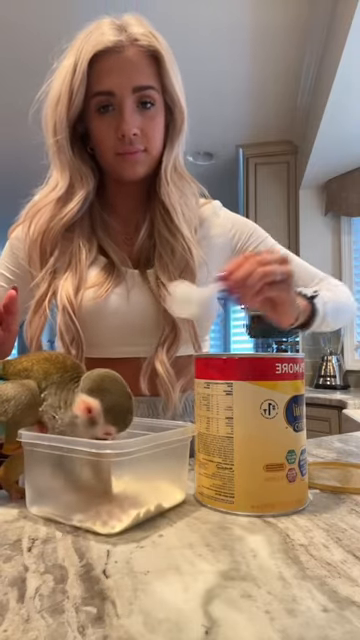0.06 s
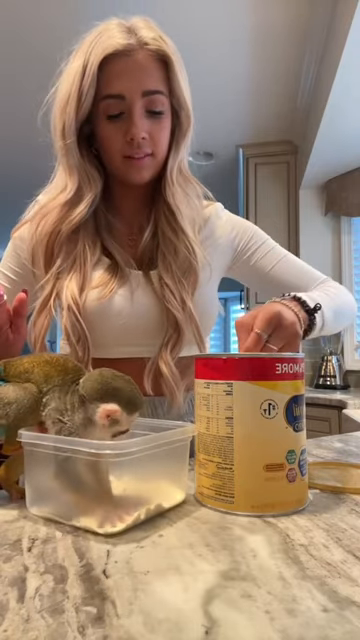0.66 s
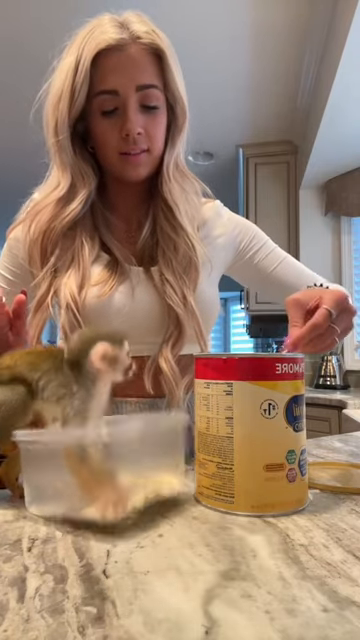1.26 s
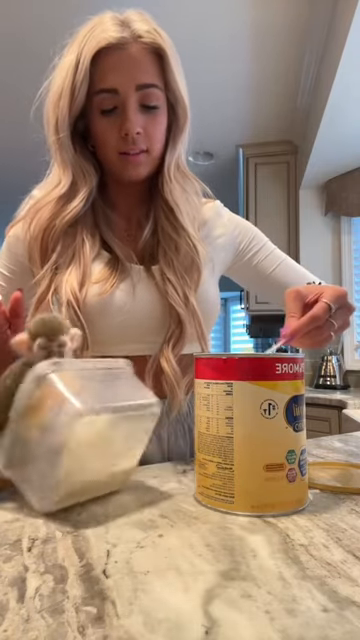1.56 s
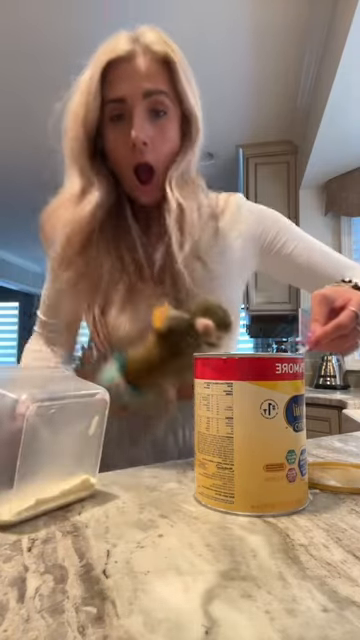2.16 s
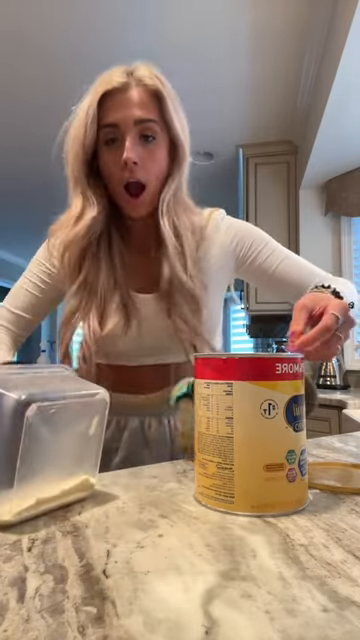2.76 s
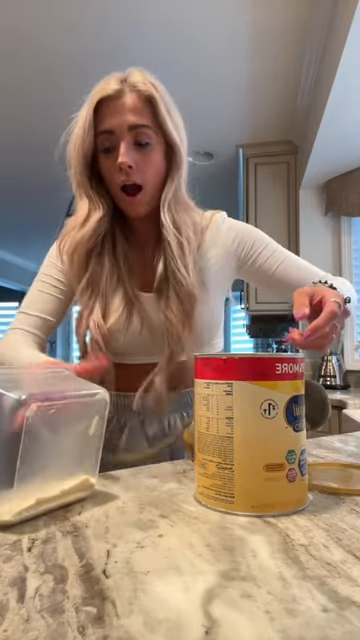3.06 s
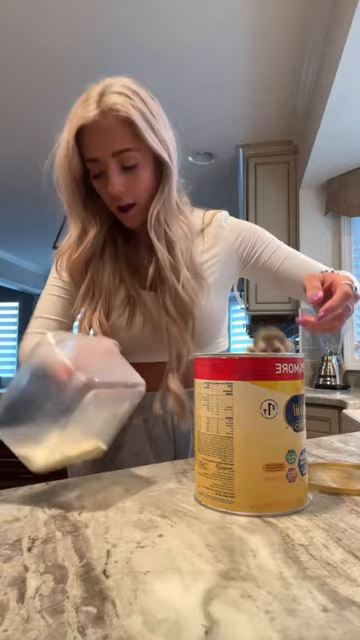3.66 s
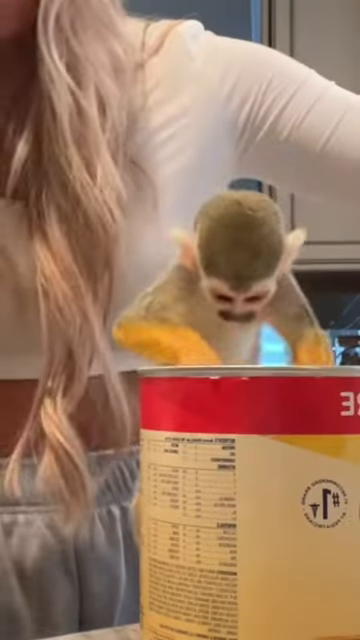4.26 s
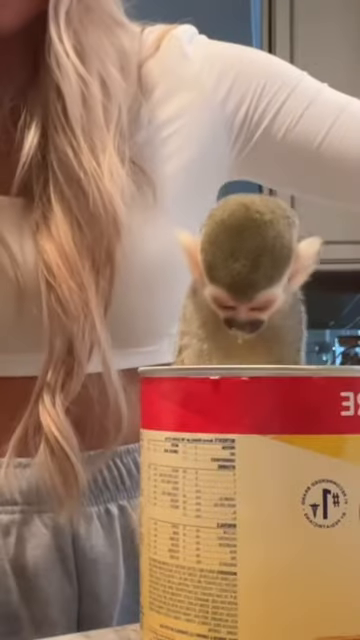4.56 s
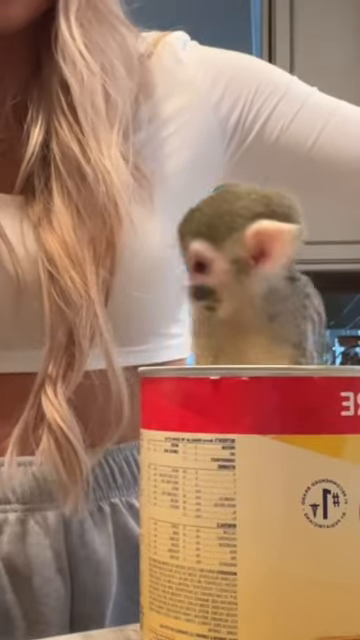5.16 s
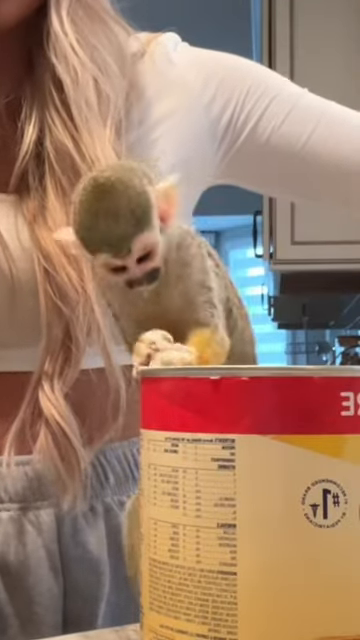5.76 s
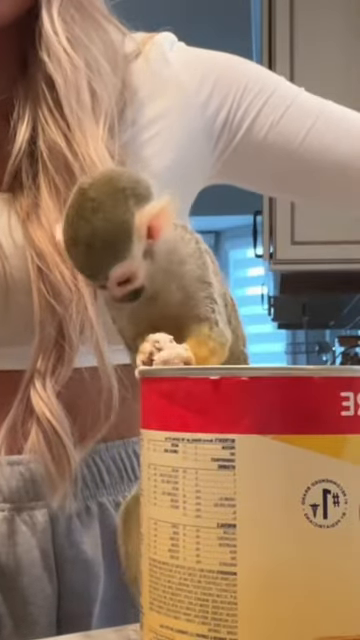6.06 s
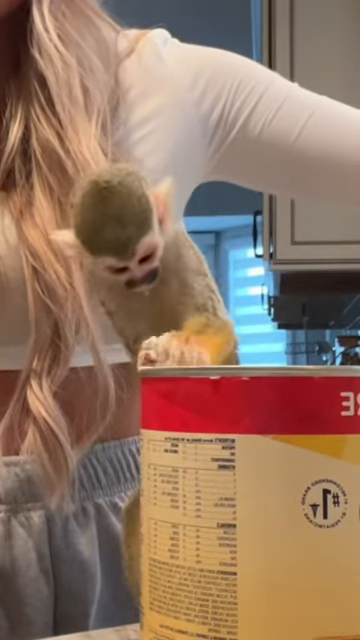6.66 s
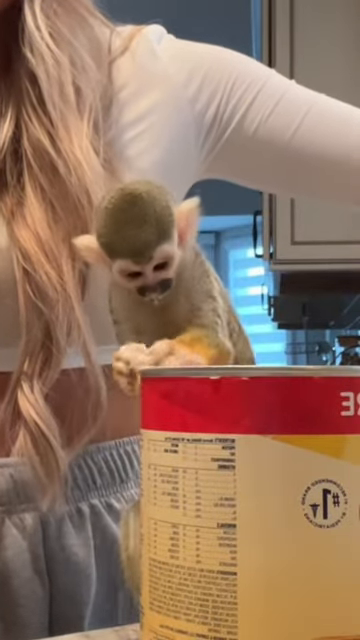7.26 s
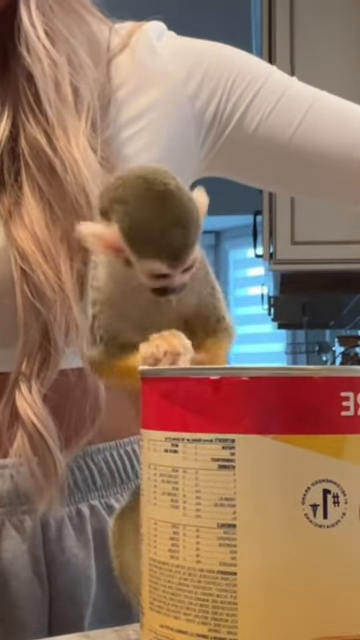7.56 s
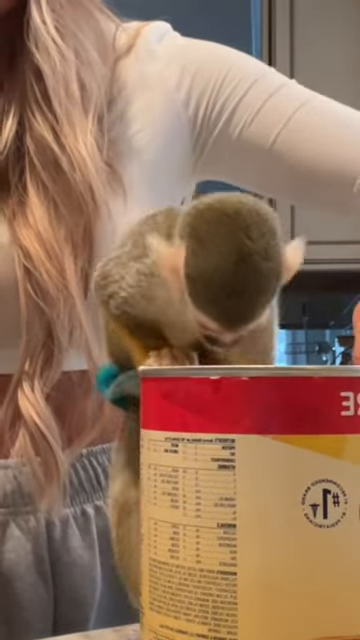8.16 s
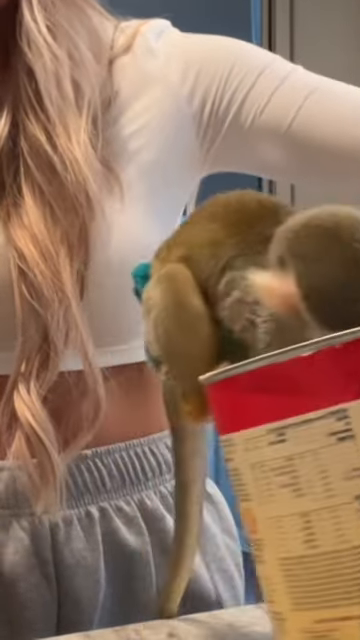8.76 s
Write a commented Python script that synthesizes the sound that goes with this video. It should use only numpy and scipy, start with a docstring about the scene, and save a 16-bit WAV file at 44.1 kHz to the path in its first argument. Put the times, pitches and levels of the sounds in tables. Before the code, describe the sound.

In a kitchen with a steady low appliance hum, a nearby scoop scratches and clicks in powder. The loudest moment comes early: a plastic tub skids, knocks and tumbles onto a stone counter with dull thuds. It then turns quiet, with light clicks, brief swishes of clothing and tiny paws picking at powder. Finally a short, damped clack sounds on a metal can, which slides over the stone with a gritty scrape.

```python
"""A plastic scoop clicks and scrapes in a can of powder, over the hum of an appliance. A small monkey
tips a plastic tub over and jumps down; clothing rustles. The monkey climbs onto the can and rummages
until it slides away. Friction is a train of tiny slips; impacts excite the damped modes of tub and can.
Soft bumps carry through the stone counter, and the kitchen reverberates briefly."""
import sys
import numpy as np
from scipy import signal
from scipy.fft import rfft, irfft
from scipy.io import wavfile
from scipy.ndimage import uniform_filter1d

SR = 44100
rng = np.random.default_rng(int(sys.argv[2]) if len(sys.argv) > 2 else 0)


def generate_wav(sig):
    """Save sig (samples, or channels by samples) to the path in sys.argv[1] as 16-bit PCM at SR."""
    pcm = np.round(np.clip(np.atleast_2d(sig).T, -1, 1) * 32767).astype(np.int16)
    wavfile.write(sys.argv[1], SR, pcm)


N = 388080
TIME = np.arange(N) / SR
BIN_HZ = np.fft.rfftfreq(N, 1 / SR)


def amp(db):
    """Decibels as an amplitude ratio."""
    return 10 ** (np.asarray(db) / 20)


def unit_rms(x):
    """Normalisation to rms 1."""
    return x / np.sqrt(np.mean(x ** 2) + 1e-20)


def curve_at(points, hz):
    """Interpolation of (frequency, value) points on a logarithmic frequency axis."""
    point_hz, value = np.transpose(points)
    return np.interp(np.log(hz + 1), np.log(point_hz + 1), value)


def add(mix, start_s, sound):
    """Superposition: a sound joins the mix at its start time."""
    part = mix[max(0, round(start_s * SR)):][:len(sound)]
    part += sound[:len(part)]


def colour(x, spectrum):
    """Spectral shaping of a full-length signal, returned at rms 1."""
    return unit_rms(irfft(rfft(x) * amp(curve_at(spectrum, BIN_HZ)), N))


def drift(rate_hz):
    """Random fluctuation: low-passed noise of rms 1."""
    return unit_rms(irfft(rfft(rng.standard_normal(N)) * np.exp(-(BIN_HZ / rate_hz) ** 2), N))


# Tones of the appliance: pitch_hz, rms_db
HUM_TONES = [(122.6, -55), (367.8, -82.5), (613, -87.5), (640.6, -85), (1717, -91), (1965, -96.5),
             (5248, -84.5)]
# Spectrum of the rushing air: frequency_hz, density_db
AIR_SPECTRUM = [(20, -15), (36, -8), (52, 2), (72, -4), (110, -3), (200, -10), (290, -16), (400, -13),
                (620, -12.5), (800, -18.5), (1400, -25), (3000, -31), (7000, -30.5), (9800, -51)]

def appliance(air_db=-67):
    """Line spectrum over broadband noise: a slightly wavering hum and whine in a soft rush of air."""
    tones = np.zeros(N)
    for hz, db in HUM_TONES:
        waver_hz = 0.1408 * np.sqrt(hz / HUM_TONES[0][0]) * drift(3.1)
        phase = 2 * np.pi * np.cumsum(hz + waver_hz) / SR
        tones += amp(db) * np.sqrt(2) * np.sin(phase)
    return tones + amp(air_db) * colour(rng.standard_normal(N), AIR_SPECTRUM)


# Reverberation time of the kitchen: frequency_hz, t60_s
ROOM_DECAY = [(60, .3), (250, .34), (1000, .38), (4000, .39), (9000, .32)]
# Colour of its reflections: frequency_hz, gain_db
ROOM_SPECTRUM = [(50, 0), (250, 2.5), (700, -4), (1500, -1), (5000, -1.5), (9000, 0.5)]

def kitchen(sound, first_echo_s=0.0021, echoes_per_s=4000):
    """Diffuse reverberation: dense reflections of random sign, each band decaying at its own rate."""
    signs = rng.choice([-1., 1.], SR)
    arrivals = (rng.random(SR) < echoes_per_s / SR) * (TIME[:SR] > first_echo_s)
    hz, t, bands = signal.stft(signs * arrivals, SR, nperseg=256)
    bands = bands * amp(-60 * t / curve_at(ROOM_DECAY, hz)[:, None])
    plain = signal.istft(bands, SR, nperseg=256)[1]
    tail = signal.istft(bands * amp(curve_at(ROOM_SPECTRUM, hz))[:, None], SR, nperseg=256)[1]
    return signal.fftconvolve(sound, tail / np.linalg.norm(plain))[:N]


# Spectrum of the vibrating counter: frequency_hz, density_db
RUMBLE_SPECTRUM = [(20, -14), (50, -5), (100, -5), (170, 0), (240, -18), (400, -40)]

def counter_rumble(start_s=1.33, end_s=1.98, rise_s=.1, release_s=.03, level_db=-45, fade_db_per_s=13):
    """Structure-borne noise: tub and monkey roll on the counter, which builds fast and fades slowly."""
    age, left = TIME - start_s, end_s - TIME
    gate = np.clip(age / rise_s, 0, 1) * np.clip(left / release_s, 0, 1)
    return gate * amp(level_db - fade_db_per_s * age) * colour(rng.standard_normal(N), RUMBLE_SPECTRUM)


def swing(hz, swell_s):
    """Damped oscillation: a low tone whose envelope swells to 1 and dies within a few cycles."""
    t = np.arange(SR // 3) / SR
    envelope = (t / swell_s) ** 2 * np.exp(-t / swell_s)
    return envelope / envelope.max() * np.sin(2 * np.pi * hz * t)


# Bumps through the counter: start_s, level_db, pitch_hz
COUNTER_BUMPS = [(.11, -55, 48), (.21, -56, 40), (1.222, -41, 169), (1.327, -36.5, 105), (1.351, -38, 210),
                 (1.396, -36.5, 150), (1.423, -33, 151.7), (1.457, -26, 96.2), (1.498, -35, 152),
                 (1.606, -35, 116), (1.668, -33, 164.5), (1.726, -27.5, 124), (2.312, -37, 45.4),
                 (2.916, -32.5, 92.2), (2.932, -30.5, 44.3), (3.124, -41.5, 131), (5.413, -35, 46.2),
                 (6.065, -42, 45.3), (6.815, -46.5, 51.7), (7.095, -53.5, 210)]

def counter_bumps(rebound_cycles=3.1, rebound_db=-12.5, rebound_stretch=1.904):
    """Soft impact excites only low frequencies: weight lands, then settles with a weaker rebound."""
    out = np.zeros(N)
    for start_s, db, hz in COUNTER_BUMPS:
        swell_s = .0055 * np.sqrt(100.6 / hz)  # deeper bumps swell more slowly
        add(out, start_s, amp(db) * swing(hz, swell_s))
        rebound = amp(db + rebound_db) * swing(hz, rebound_stretch * swell_s)
        add(out, start_s + rebound_cycles / hz, rebound)
    return out


def stick_slip(per_s, spread_db, clump_db=2):
    """Stick-slip motion: tiny random impulses of uneven size, swelling in clumps."""
    size = amp(spread_db * np.minimum(rng.exponential(1, N), 3.5) + clump_db * drift(70))
    return size * rng.standard_normal(N) * (rng.random(N) < per_s / SR)


def wandering_resonances(slips, depth_db=2.5):
    """Position-dependent coupling: a moving contact favours ever different resonances of the surface."""
    bands = signal.stft(slips, nperseg=512)[2]
    patches = uniform_filter1d(rng.standard_normal(bands.shape), size=4, axis=0)
    patches = unit_rms(uniform_filter1d(patches, size=12, axis=1))
    return signal.istft(bands * amp(depth_db * patches), nperseg=512)[1][:N]


# Spectrum of the rubbed surfaces: frequency_hz, density_db
GRIT_SPECTRUM = [(600, -32.5), (1400, -5.5), (2300, -1.5), (3000, -0.5), (3800, 0), (4800, -1.5), (6000, 3),
                 (7200, -5), (8500, -14), (9800, -30)]

def friction(slips, bright_db, crossover_hz=5370):
    """Friction noise: slips excite the surfaces; brightness tips the balance about the crossover."""
    grit = colour(wandering_resonances(slips), GRIT_SPECTRUM)
    lows = irfft(rfft(grit) / (1 + (BIN_HZ / crossover_hz) ** 6), N)
    return lows * amp(-bright_db / 2) + (grit - lows) * amp(bright_db / 2)


# Soft swishes and rustles of clothing, paws, fur and powder: start_s, length_s, level_db, brightness_db
SWISHES = [(2.075, 0.45, -71, 1), (2.478, .12, -66, 7), (2.89, 0.22, -68, -2), (3.077, 0.072, -60, 4),
           (4.18, 0.12, -63.5, 1.5), (4.619, .1, -72.5, -.5), (5.419, .12, -76, 0), (5.582, .11, -69, -1.5),
           (5.747, .025, -67, -1), (5.96, .15, -70, 2), (6.262, .063, -75.5, 1.5),
           (6.657, 0.18, -70.5, 2.5), (6.858, 0.15, -73.5, 2), (7.023, 0.094, -66, 1),
           (7.129, 0.16, -63.5, 11), (7.416, .15, -68, 6), (7.683, 0.052, -65.5, 1), (7.967, .05, -66, 5.5),
           (8.248, 0.042, -56.5, 3)]

def rustling(trim_db=-1, stir_from_s=4.0, stir_db=-85, stir_wander_db=4):
    """Light friction: clothing, paws, fur and powder swish briefly, later over a faint stirring."""
    gain = amp(stir_db + stir_wander_db * drift(6)) * (TIME > stir_from_s)
    for start_s, length_s, db, _ in SWISHES:
        add(gain, start_s, amp(db + trim_db) * signal.windows.tukey(int(length_s * SR), 0.38))
    starts, lengths, _, brightness = np.transpose(SWISHES)
    bright_db = np.interp(TIME, starts + lengths / 2, brightness)
    return gain * friction(stick_slip(per_s=3300, spread_db=2.5), bright_db)


# The scoop works through the powder: time_s, grit_db, body_db
SCOOP_DIG = [(.045, -60, -67), (.07, -55.5, -67), (.15, -59, -68), (.37, -58.5, -68), (.41, -74.5, -82),
             (.55, -64, -80), (.64, -71, -88), (.8, -64, -73), (.92, -73, -77), (1.12, -72, -80)]
# The tub tips, skids and settles: time_s, grit_db, body_db
TUB_SKID = [(1.1, -66, -73), (1.165, -44.5, -55), (1.25, -61, -66), (1.39, -53.5, -47), (1.44, -46, -46),
            (1.5, -62, -48), (1.675, -56, -54), (1.75, -74, -64), (1.95, -76, -70)]
# The can is pushed along the stone: time_s, grit_db, body_db
CAN_PUSH = [(8.3, -71, -68), (8.35, -54.5, -53.5), (8.43, -63, -66), (8.49, -51.5, -48), (8.56, -57, -58.5),
            (8.587, -51, -72), (8.62, -69, -79), (8.68, -62, -81), (8.8, -81, -82)]
# Response of a hollow container: frequency_hz, density_db
BODY_SPECTRUM = [(150, -16), (280, -3), (400, 2), (650, 1.5), (1000, -0.5), (1500, -13), (2500, -25),
                 (5000, -45)]

def scraping(scoop_bright_db=-5, tub_bright_db=-2, can_bright_db=1.5, brighter_per_db=.3):
    """Forced vibration: slips drive the hollow containers, under grit that brightens with pressure."""
    grit_gain, body_gain, bright_db = np.zeros((3, N))
    gestures = (SCOOP_DIG, scoop_bright_db), (TUB_SKID, tub_bright_db), (CAN_PUSH, can_bright_db)
    for rows, base_bright_db in gestures:
        time_s, grit_db, body_db = np.transpose(rows)
        active = (TIME >= time_s[0]) & (TIME < time_s[-1])
        pressure_db = np.interp(TIME[active], time_s, grit_db)
        grit_gain[active] = amp(pressure_db)
        body_gain[active] = amp(np.interp(TIME[active], time_s, body_db))
        bright_db[active] = base_bright_db + brighter_per_db * (pressure_db - grit_db.mean())
    slips = stick_slip(per_s=5000, spread_db=1.1)
    return body_gain * colour(slips, BODY_SPECTRUM) + grit_gain * friction(slips, bright_db)


def minimum_phase(spectrum_db):
    """Minimum phase: the most compact causal impulse response with this spectrum."""
    log_gain = np.log(amp(np.r_[spectrum_db, spectrum_db[-2:0:-1]]))
    return np.fft.ifft(np.exp(np.conj(signal.hilbert(log_gain)))).real


# Spectrum of a hard contact: frequency_hz, density_db
CONTACT_SPECTRUM = [(100, -21.5), (400, -15.5), (700, 0), (3000, 5.5), (7000, 4), (8400, -2), (9000, -10.5),
                    (9800, -21)]

def contact(db, tilt_db, ring_hz, scatter_s, ring_db, ring_octaves=.52, size=2048):
    """Source and filter: a snap and micro-slips ring one resonance. Returns direct and diffuse sound."""
    t, hz = np.arange(size) / SR, np.fft.rfftfreq(size, 1 / SR)
    base_db = curve_at(CONTACT_SPECTRUM, hz)
    octaves = np.log2(np.maximum(hz, 600) / ring_hz)
    shape_db = tilt_db * octaves + ring_db * np.exp(-(octaves / ring_octaves) ** 2)
    age = t / scatter_s
    force = 0.37 * rng.standard_normal(size) * np.sqrt(2 * age) * np.exp(-1.3 * age)
    force[0] += 1  # the snap
    direct = signal.fftconvolve(force, minimum_phase(base_db + shape_db))[:size]
    diffuse = minimum_phase(base_db + 0.56 * shape_db)  # the sound sent all around is more even
    # each carries the energy of 5 ms at the given level
    return [amp(db) * x / np.sqrt(np.sum(x ** 2) / (.005 * SR)) for x in (direct, diffuse)]


# Contacts of scoop, tub, claws and can: start_s, level_db, tilt_db_per_octave, ring_hz, scatter_s
HARD_CONTACTS = [(0.039, -39, 2.5, 2030, 0.0075), (0.048, -43.5, -4, 6110.0, 0.0059),
                 (0.0891, -43.5, 1, 3300.0, 0.0019), (0.245, -39.5, 2, 4770.0, 0.004),
                 (0.3275, -49, -3, 2470, 0.0023), (0.351, -48.5, -2, 2570, 0.002),
                 (0.4413, -52, 1.5, 2200, 0.002), (0.599, -53.5, 0.5, 2800.0, 0.002),
                 (1.4116, -23, -4.5, 6200, 0.0015), (1.446, -39, 0.0, 1510.0, 0.005),
                 (1.4764, -30.5, -9, 2870, 0.0056), (1.598, -31.5, -3.5, 5660, 0.0052),
                 (1.6328, -39, 2, 6910.0, 0.0027), (1.654, -45, -4.5, 5180.0, 0.004),
                 (1.7164, -38, -1.5, 1330.0, 0.0084), (1.7934, -44, -4.5, 5620.0, 0.0054),
                 (2.029, -54, -6, 2750, 0.0013), (2.209, -56.5, -2.5, 2680, 0.0017),
                 (2.262, -56.5, -4, 3030, 0.0015), (2.3654, -50.5, -2.5, 2480, 0.0012),
                 (2.467, -53, -4, 2390, 0.002), (2.4767, -39.5, -1.5, 5100, 0.0017),
                 (2.489, -45.5, -0.5, 6800, 0.003), (2.9833, -50.5, -3.5, 1630, 0.0035),
                 (3.096, -45.5, -5.5, 5800, 0.0093), (3.11, -47, -4, 5860.0, 0.0045),
                 (3.259, -58, -4, 2910.0, 0.0011), (3.3365, -35.5, -3.5, 1400, 0.0012),
                 (4.201, -48.5, -1.5, 1380, 0.0043), (5.1935, -59, -7.5, 5630, 0.0017),
                 (6.6833, -54, 0.5, 1570.0, 0.0036), (6.719, -54.5, -2, 4770.0, 0.003),
                 (7.1842, -51.5, 0, 6910.0, 0.0054), (7.402, -57.5, -2, 5620.0, 0.002),
                 (7.6352, -57.5, 2, 1850.0, 0.0056), (7.767, -54.5, 5, 6650, 0.0041),
                 (7.9238, -59, -6, 4360, 0.001), (8.032, -55.5, -8, 5900, 0.0027),
                 (8.0817, -34, -2, 1920, 0.0019)]
# An edge of tub or can catches on the stone: start_s, level_db, ring_hz
EDGE_PINGS = [(1.9673, -31.5, 4200), (8.3528, -45.5, 3860), (8.379, -48, 3500), (8.395, -46.5, 5700),
              (8.4276, -49, 3800), (8.6732, -52.5, 5300), (8.7285, -50, 5800), (8.735, -50, 5600)]

def clicks(trim_db=-1, click_ring_db=8, ping_ring_db=19, feeding_s=(5.3, 8.6), ticks_per_s=3):
    """Brief impacts are broadband: clicks, sharply ringing edges, and random claw ticks during feeding."""
    events = [(*row, click_ring_db) for row in HARD_CONTACTS]
    events += [(start_s, db, -3, hz, .001, ping_ring_db) for start_s, db, hz in EDGE_PINGS]
    for when, force, place in rng.random((round(ticks_per_s * np.ptp(feeding_s)), 3)):
        start_s = np.interp(when, [0, 1], feeding_s)
        db = -70 + 3.5 * (2 * force - 1)
        ring_hz = np.interp(place, [0, 1], [1800, 6000])
        events.append((start_s, db, -2.5, ring_hz, .002, click_ring_db))
    direct, diffuse = np.zeros((2, N))
    for start_s, db, *timbre in events:
        for mix, sound in zip((direct, diffuse), contact(db + trim_db, *timbre)):
            add(mix, start_s, sound)
    return direct, diffuse


def ring(modes, t):
    """Free vibration: a sum of exponentially decaying modes."""
    return sum(amp(db - 60 * t / t60_s) * np.sin(2 * np.pi * hz * t) for hz, db, t60_s in modes)


# Modes of the can: pitch_hz, level_db, t60_s
RIM_MODES = [(1080, -12, .012), (1470, -10, 0.0098), (1790, -0.5, 0.0098), (2200, -5, 0.0088),
             (2820, -1, .014)]

def rim_tap(start_s=8.0818, gain_db=-25, cutoff_hz=1100):
    """Heavy damping: powder stops the metal rim's clack at once, and so narrow a rim radiates no bass."""
    out, t = np.zeros(N), np.arange(SR // 16) / SR
    highpass = signal.butter(4, cutoff_hz, "high", fs=SR, output="sos")
    add(out, start_s, amp(gain_db) * signal.sosfilt(highpass, ring(RIM_MODES, t)))
    return out


# Modes of the tub at pitch ratio 1: pitch_hz, level_db, t60_s
WALL_MODES = [(389.4, -18, 0.03), (735, 1, 0.023), (841, -7.5, .014), (1027, -10.5, 0.0094)]
# Hollow blows on the tub: start_s, gain_db, pitch_ratio
TUB_BLOWS = [(1.2056, -22.5, .99), (1.2084, -17, 1.0), (1.3529, -21, 1.006), (1.412, -9, 1.224),
             (1.4205, -25, 0.91), (1.4525, -22.5, 1), (1.459, -23, 0.56), (1.4765, -15, 1.06),
             (1.486, -21.5, 0.99), (1.503, -27.5, 0.86), (1.5988, -26.5, 0.76), (1.655, -27.5, 0.75),
             (1.7163, -30, 1.0), (1.982, -37.5, 0.77), (3.3383, -33, 0.95)]

def tub_knocks():
    """Modal ringing: the thin walls sound for a few cycles, higher or lower with the place struck."""
    out, t = np.zeros(N), np.arange(SR // 8) / SR
    for start_s, db, pitch_ratio in TUB_BLOWS:
        rise_s = 0.00093 / pitch_ratio ** 2  # stiffer, higher places answer sooner
        attack = 1 - np.exp(-t / rise_s)
        add(out, start_s, amp(db) * attack * ring(WALL_MODES, pitch_ratio * t))
    return out


def scene():
    """Direct and reverberant fields add: impacts and friction each excite the room, over the hum."""
    click, click_diffuse = clicks()
    knock, rim = tub_knocks(), rim_tap()
    thud = counter_bumps() + counter_rumble()
    rub = scraping() + rustling()
    room = kitchen(amp(-6) * (click_diffuse + rub) + amp(-9.5) * knock + amp(-12) * thud + amp(-15) * rim)
    return (click + knock + thud + rim + rub + room + appliance())[None]


def record(dry, cutoff_hz=9950):
    """Band limiting: a steep low-pass filter removes the highest treble."""
    lowpass = signal.firwin(401, cutoff_hz, window=("kaiser", 8), fs=SR)
    return signal.oaconvolve(dry, lowpass[None], "same")


dry = scene()
out = record(dry)
generate_wav(out)
```